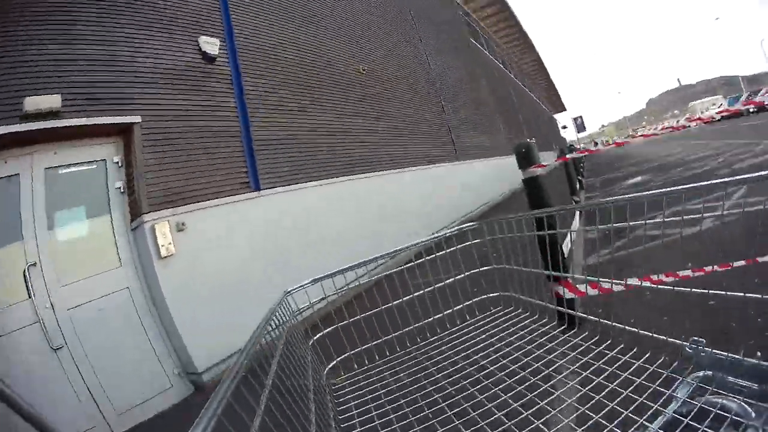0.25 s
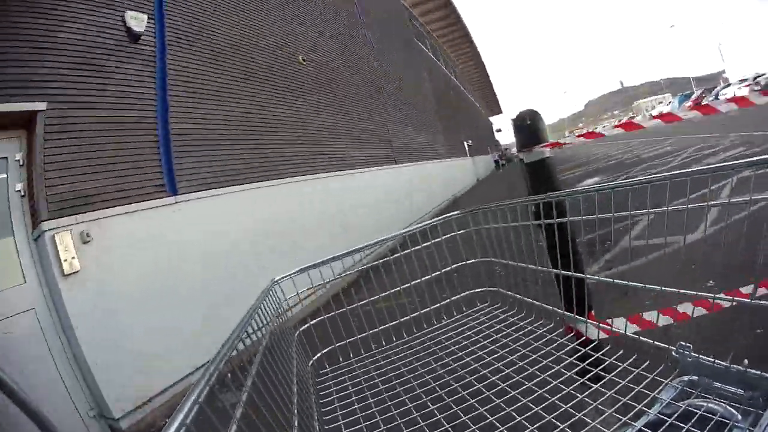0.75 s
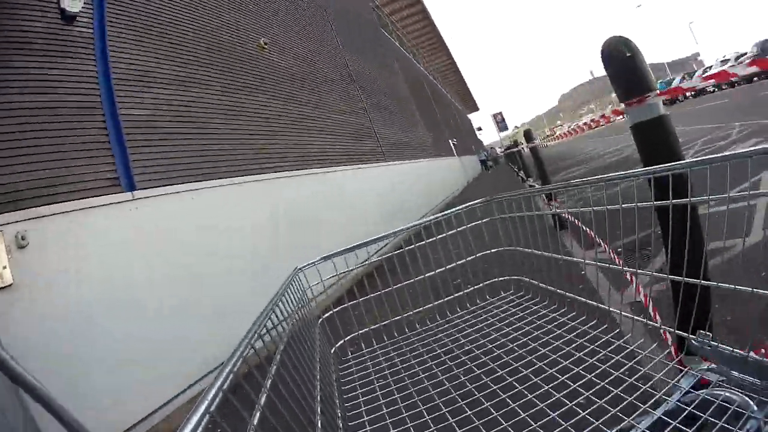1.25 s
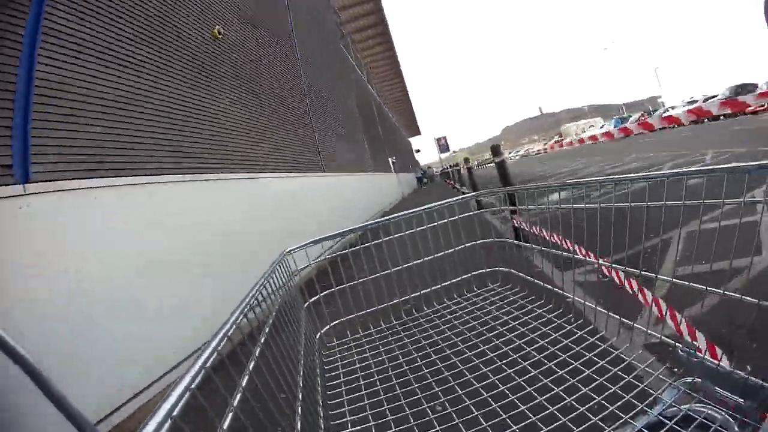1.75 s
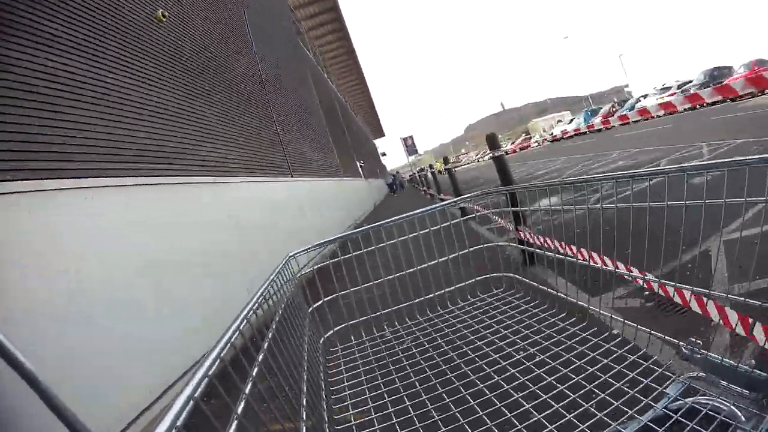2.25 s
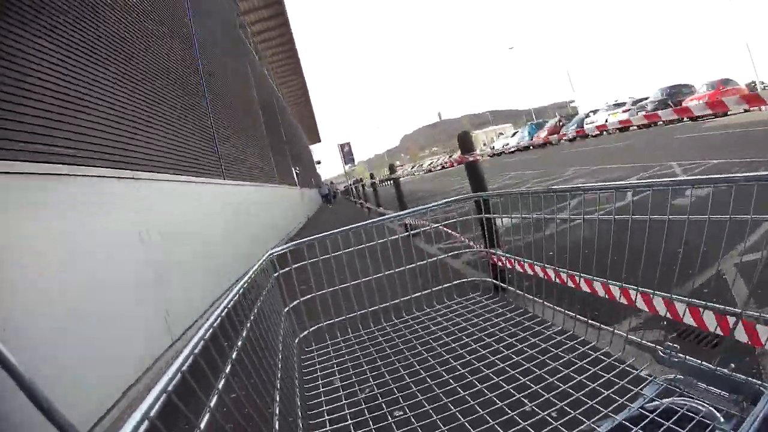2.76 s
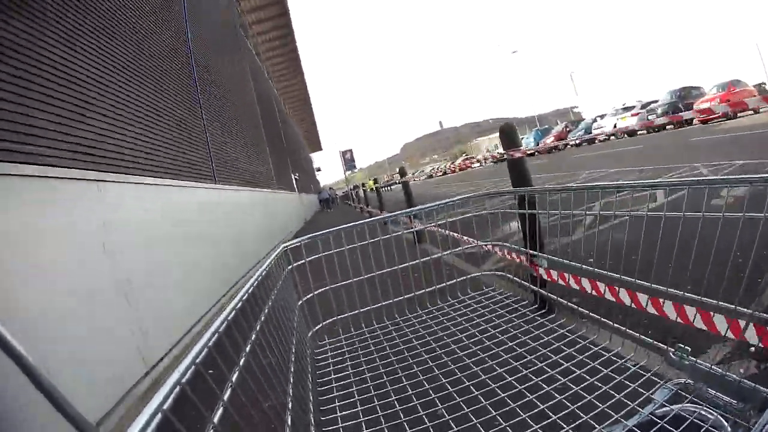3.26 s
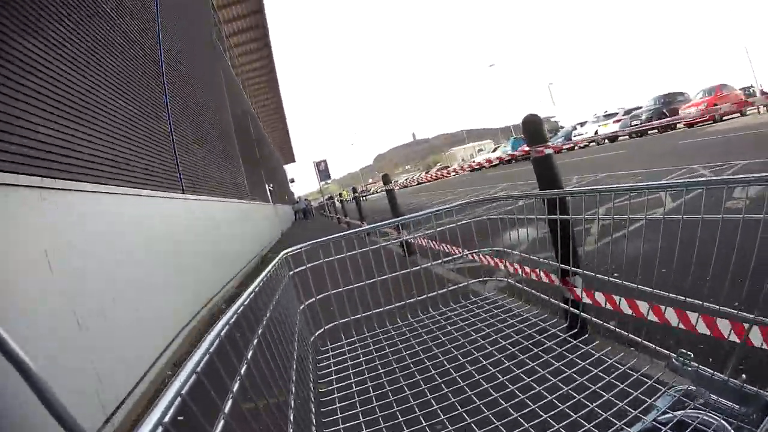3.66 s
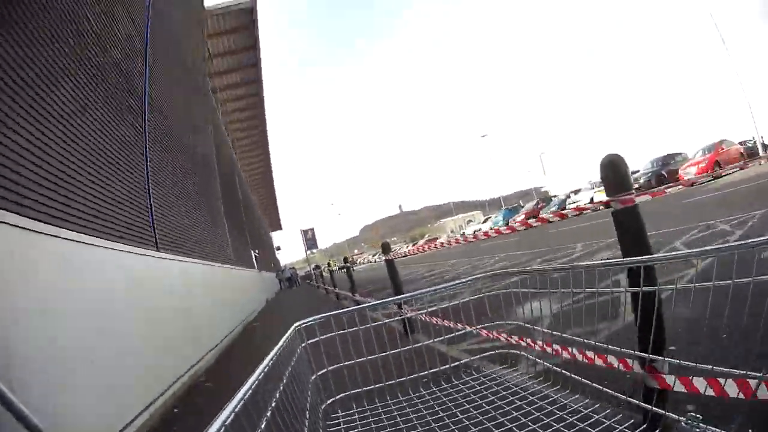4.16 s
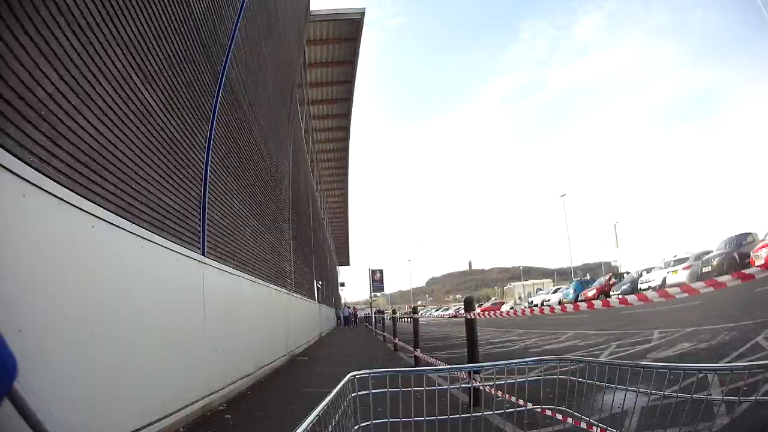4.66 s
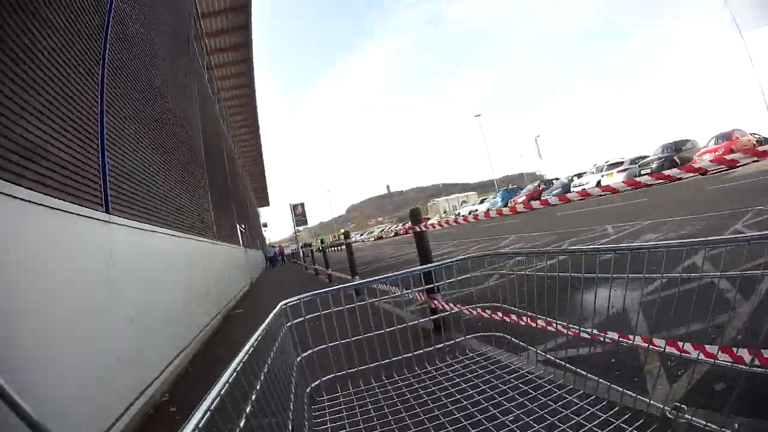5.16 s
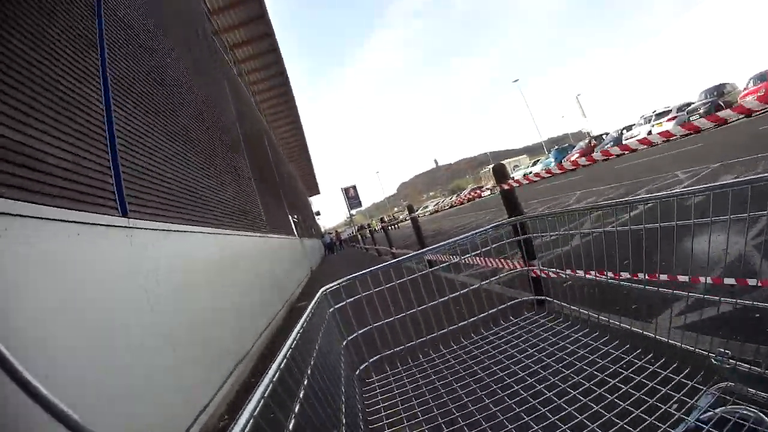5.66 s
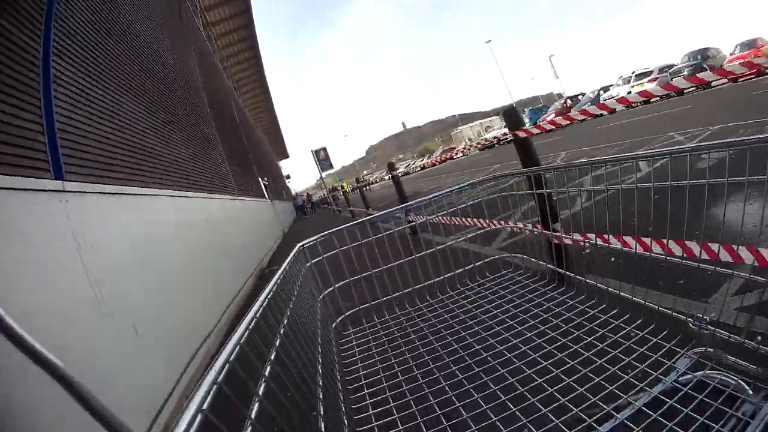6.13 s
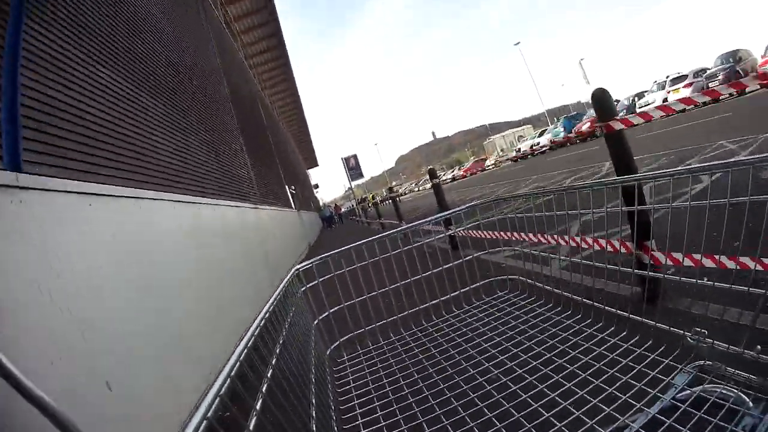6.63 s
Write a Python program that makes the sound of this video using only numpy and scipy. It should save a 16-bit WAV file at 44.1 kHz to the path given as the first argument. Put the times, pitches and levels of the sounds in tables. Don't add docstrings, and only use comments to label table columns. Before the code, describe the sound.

An empty shopping trolley rolls outside, its basket ticking and rattling, with clustered harsh clacks close to the microphone that thin into quiet rolling.

```python
import sys
import numpy as np
from scipy import signal
from scipy.fft import rfft, irfft
from scipy.io import wavfile
from scipy.ndimage import uniform_filter1d, minimum_filter1d

SR = 44100
rng = np.random.default_rng(int(sys.argv[2]) if len(sys.argv) > 2 else 0)


def volts_from_db(level):
    exponent = np.asarray(level, float) / 20
    return 10 ** exponent


def unload_audio(sound):
    columns = np.transpose(np.atleast_2d(sound))
    steps = np.round(np.clip(columns, -1, 1) * 32767)
    wavfile.write(sys.argv[1], SR, steps.astype(np.int16))


N = 303849

# t/s, jiggle of the mesh level/dB, coarseness of the ground level/dB
ROLLING = [(0, -54.5, -57), (.38, -51, -55.5), (.7, -52.5, -56.5), (.95, -46, -49.5), (1.33, -53.5, -53.5),
           (1.55, -50.5, -66), (1.9, -49.5, -55.5), (2.1, -53.5, -59.5), (2.47, -49.5, -53),
           (2.66, -55, -54.5), (2.85, -44, -45), (3.23, -42.5, -43.5), (3.6, -48.5, -43),
           (3.8, -43.5, -48.5), (4.0, -47.5, -47.5), (4.3, -56.5, -60.5), (5.2, -57, -64), (6.89, -56, -57)]
# centre t/s, half length t/s, jiggle change level/dB, coarseness change level/dB
GROUND_PATCHES = [(0.258, 0.056, -1, 7), (1.707, 0.16, 7.5, 19.5), (2.267, 0.23, 5, 13),
                  (3.02, 0.16, 1, -4), (4.76, 0.15, 4, 0.5), (5.331, 0.095, 8.5, 12), (5.655, 0.27, 1, 8.5),
                  (5.904, 0.072, -6, -1), (6.227, 0.21, 5, 10), (6.502, 0.1, -6.5, -3),
                  (6.638, 0.12, 12, 9.5)]
# f/Hz, level/dB (per Hz)
WHEEL_SPECTRUM = [(15, 1), (30, -1), (75, 4.5), (130, -3), (260, -1.5), (450, -6), (900, -9.5), (1500, -35),
                  (3000, -63)]
# f/Hz, width f/Hz, level/dB
BASKET_MODES = [(252, 39, 19), (564, 16, 2), (690, 85, -6), (850, 37, -19)]
# f/Hz, level/dB
WIRE_SPECTRUM = [(1500, -8), (2500, -7.5), (3500, -6.5), (4500, -0.5), (5700, 6), (6500, 1.5), (7500, -6),
                 (9000, -14), (11000, -27.5), (13000, -28.5), (16000, -68)]
# t/s, level/dB
WIRE_TICKS = [(0.1834, -38), (0.242, -29), (0.2882, -34), (0.3862, -29), (0.44, -28), (0.4707, -28.5),
              (0.492, -31), (0.7167, -26), (0.8602, -23), (2.3316, -26.5), (2.5916, -30.5), (2.9326, -20.5),
              (3.3338, -31), (3.4106, -36), (3.4987, -24), (4.1016, -25), (4.1145, -28.5), (4.1453, -29),
              (4.655, -32.5), (4.996, -34), (5.3715, -22.5), (5.8238, -32), (6.0646, -32), (6.121, -35),
              (6.1624, -22), (6.238, -27), (6.2982, -30), (6.3741, -22), (6.55, -32), (6.665, -28),
              (0.0555, -37), (0.2332, -33), (0.3534, -39), (0.4202, -35), (3.265, -26),
                       (3.4242, -34), (3.6174, -31.5), (4.058, -33), (4.1855, -34.5), (4.4212, -36.5),
                       (4.564, -37.5), (4.633, -37), (5.0376, -39), (5.1114, -37.5), (5.1363, -37),
                       (5.2036, -37), (5.288, -39), (5.3608, -34), (5.4254, -37), (5.5276, -37),
                       (5.8614, -40.5), (6.1876, -41), (6.2806, -35), (6.3136, -33), (6.3987, -34),
                       (6.685, -31), (6.6967, -35), (6.829, -35.5), (6.849, -42)]
# t/s, level/dB
LONG_WIRE_TOUCHES = [(0.0478, -41.5), (0.242, -39.5), (0.324, -36), (0.3988, -36), (0.551, -39),
                     (0.7158, -41), (2.331, -36.5), (3.3338, -49), (3.971, -34), (4.0883, -41),
                     (4.1754, -41), (4.214, -45), (4.3253, -48), (4.3437, -38.5), (4.568, -42),
                     (4.622, -40), (4.7426, -37), (4.78, -40.5), (4.8114, -43), (4.872, -45), (4.896, -43),
                     (4.962, -41.5), (5.295, -42), (5.3364, -44), (5.4386, -50), (5.6598, -41.5),
                     (5.7086, -50), (5.8037, -46.5), (5.9456, -43.5), (6.732, -43)]
# t/s, level/dB
WHEEL_BUMPS = [
    (.27, -38),
    (1.47, -23),
    (4.35, -44),
    (5.22, -38),
    (5.3, -39),
    (5.639, -38),
    (5.69, -32.5),
    (5.72, -37),
    (5.8, -42.5),
    (6.87, -39),
]
# t/s, level/dB
FRAME_THUDS = [(1.2121, -19), (1.4668, -11.5), (1.541, -31), (1.634, -25.5), (1.7992, -19.5),
               (2.171, -11.5), (2.7383, -26), (2.986, -19.5), (5.373, -12), (5.3817, -16.5),
               (5.3916, -26.5), (5.686, -37), (5.708, -39), (6.164, -14), (6.178, -28), (6.2137, -35),
               (6.237, -23), (6.3758, -13.5), (6.3982, -22), (6.407, -23), (6.425, -30), (6.862, -39),
               (6.873, -43)]
# f/Hz, relative size, t60 t/s
FRAME_MODES = [(310, 0.85, 0.026), (403, 0.51, 0.021), (543, 0.45, 0.028), (1590, 0.056, 0.027)]
# t/s, blow above overload level/dB
SCATTERED_KNOCKS = [(0.5995, 6.5), (0.67, 6), (0.6848, -3), (0.6984, 9.5), (0.779, -1.5), (1.1638, 5),
                    (1.2102, 19), (1.2514, -6), (1.4304, 8), (1.4661, 31), (1.4963, 1), (1.5381, 11),
                    (1.5827, 10.5), (1.6153, -5), (1.6316, 7), (1.6656, 12.5), (1.6953, -5), (1.7064, -7.5),
                    (1.7975, 14.5), (1.8142, -8.5), (1.8334, -3), (1.8716, -8.5), (2.054, -7), (2.1155, 6),
                    (2.1692, 29), (2.1994, 5), (2.231, -6), (2.4039, -4.5), (2.4275, 1.5), (2.4795, 7)]
# t/s, blow above overload level/dB
COARSE_STRETCH_KNOCKS = [(2.6733, -5), (2.7011, 6.5), (2.7359, 11), (2.7619, -1), (2.775, 1), (2.8487, 1.5),
                         (2.8851, -2.5), (2.9842, 24), (3.0584, 4), (3.1171, 1), (3.0959, -10.5),
                         (3.1524, 6), (3.161, -5.5), (3.2521, 3), (3.321, 1.5), (3.3803, -8), (3.4452, 2.5),
                         (3.5593, -3), (3.6517, 7), (3.6712, -10), (3.682, -3.5), (3.7642, -1.5),
                         (3.7842, 8), (3.822, -2), (3.839, -5.5), (3.8781, -5), (3.9476, -6),
                         (3.9606, -3.5), (4.0045, 4.5), (4.02, -8.5)]
# t/s, blow above overload level/dB,
# thump level/dB
TOUCHES_WITH_THUMP = [(0.6412, -13, -26), (0.647, -14, -29), (1.2595, -10.5, -21.5), (1.6445, -8.5, -28),
                      (1.6804, -11, -27), (1.6827, -14, -38), (1.7031, -8.5, -31), (2.18, -12, -14.5),
                      (2.381, -18.5, -29), (2.6808, -12.5, -41), (2.7522, -13, -21), (2.8154, -12.5, -30.5),
                      (2.866, -12, -24), (2.8724, -11, -27), (2.9504, -11, -45), (2.9949, -12, -37),
                      (3.013, -12, -22), (3.1274, 14, -44), (3.167, -14, -31), (3.2323, -9.5, -31),
                      (3.239, -15.5, -38), (3.2907, -12.5, -26.5), (3.4787, -11, -22), (3.667, -7, -38),
                      (3.7169, -13.5, -25), (3.7919, -8, -19.5), (3.8543, -10, -27), (3.8646, -9, -26),
                      (3.8871, -11, -26.5), (3.8971, -9, -28)]
# f/Hz, signed size, t60 t/s
HOUSING_MODES = [(106, 0.27, 0.029), (254, -0.64, 0.016), (521, -0.49, 0.028), (615.7, -0.21, 0.07),
                 (903, 0.66, 0.02), (1065, -0.1, 0.064), (1664, 0.32, 0.011)]
# f/Hz, size, t60 t/s
SHELL_MODES = [(2650, 0.06, 0.0026), (3940, 0.014, 0.0028), (6600, 0.03, 0.0011), (10100, 0.044, 0.01),
               (12170, 0.13, 0.0052), (15800, 0.01, 0.0012)]
# upper band edge f/Hz, level/dB below which sound is lost beside a
# knock, level/dB below which it is always lost
DROPOUT_BANDS = [(1570, -51, -95), (3440, -48.5, -90), (4630, -50.5, -91), (6700, -46.5, -85),
                 (9040, -46.5, -75), (16000, -53.5, -81)]

PORT_HZ, WIRE_HZ = 5613, 2968
COARSE_DB = -51
RUMBLE_EASE = 0.26
HUM_DB, SWISH_DB = -1.5, -2.5
HUM_SLOPE, SWISH_FADE = 1.34, 2.1
PING_TICK_DB = 4
BUMP_HZ, BUMP_T60_S = 150, 0.037
JOLT_HZ, JOLT_T60_S, JOLT_DB, JOLT_SLOPE = 75, 0.038, -43.5, 0.98
BODY_DB, BODY_SLOPE, BODY_FULL_DB = -19, 0.47, 15
REBOUND_MS, REBOUND_SPREAD_MS, REBOUND_DB, REBOUND_BODY_DB = 5.2, 1.3, -20.5, -12
JITTERS = 260
JITTER_DB, JITTER_SLOPE, JITTER_BODY_DB = -38.5, 1.9, -9.5
SLOT_S, SLOT_OFFSET = 1024 / 48000, .24
TOP_HZ = 16700


def unit(x):
    return x / np.sqrt(np.mean(x ** 2))


def colour(x, table):
    hz, db = np.transpose(table)
    grid = np.log(np.arange(len(x) // 2 + 1) * SR / len(x) + 1)
    gain = volts_from_db(np.interp(grid, np.log(hz), db))
    return irfft(rfft(x) * gain, len(x))


def band(x, hz, width):
    return signal.lfilter(*signal.iirpeak(hz, hz / width, fs=SR), x)


def ring(modes, length):
    t = np.arange(int(length * SR)) / SR
    return sum(g * np.sin(2 * np.pi * hz * t) * np.exp(-np.log(1000) * t / t60) for hz, g, t60 in modes)


def blows(s, db):
    return np.bincount(np.clip((s * SR).astype(int), 0, N - 1), volts_from_db(db), N)


def smear(x, response):
    return signal.fftconvolve(x, response)[:N]


def fade(t60):
    return np.exp(-np.log(1000) * np.arange(int(t60 * SR)) / (t60 * SR))


def walk(rate):
    k = int(SR / rate)
    held = np.repeat(rng.standard_normal(N // k + 1), k)
    slewed = uniform_filter1d(uniform_filter1d(held, k), k)
    return unit(slewed[:N])


def ground():
    t = np.arange(N) / SR
    s, *columns = np.transpose(ROLLING)
    levels = np.array([np.interp(t, s, c) for c in columns])
    for at, half, jiggle_db, coarse_db in GROUND_PATCHES:
        presence = np.clip(1 - np.abs(t - at) / half, 0, 1)
        levels += presence * np.array([[jiggle_db], [coarse_db]])
    return levels


def wheels(rumble_db, swish_db):
    rumble = unit(colour(rng.standard_normal(N), WHEEL_SPECTRUM)) * volts_from_db(2.6 * walk(25))
    hiss = band(band(rng.standard_normal(N), 1660.0, 2300.0), 1760.0, 3100.0)
    swish = unit(hiss) * volts_from_db(4.6 * walk(90))
    return volts_from_db(rumble_db + 2.5) * rumble + volts_from_db(swish_db - 3.0) * swish


def basket(db):
    shake = rng.standard_normal(N) * volts_from_db(3.6 * walk(60))
    hum = unit(sum(volts_from_db(g) * band(shake, hz, w) / np.sqrt(w) for hz, w, g in BASKET_MODES))
    mesh = unit(band(shake, 629.0, 26.0) + band(shake, 602.3, 14.0)) * volts_from_db(.5 * (db + 39.0))
    return volts_from_db(db - 5.5) * band(hum + mesh, 580.0, 940.0)


def burst(envelope):
    noise = rng.standard_normal(N)
    return colour(envelope * noise, WIRE_SPECTRUM) / np.std(colour(noise, WIRE_SPECTRUM))


def wires(hits, low_hits):
    tick = burst(0.36 * smear(hits, fade(0.0049)) + 0.3 * smear(hits, fade(0.037)))
    low = smear(low_hits, ring([(WIRE_HZ, 1.1, .028), (2850, .8, .024), (3090, .7, .02)], .06))
    return tick + band(low, WIRE_HZ, 716.0)


def rattle(db):
    touches = 1400
    where = rng.random(touches) * N / SR
    size = np.minimum(rng.exponential(size=touches), 4)
    low = rng.standard_normal(touches)
    ticks = wires(blows(where, 3.5 * size), blows(where, 2.5 * size + 4.0 * low - 15))
    blur = burst(volts_from_db(3.5 * walk(45)))
    shake = rng.standard_normal(N) * volts_from_db(6.5 * walk(250))
    buzz = unit(band(band(shake, PORT_HZ, 1000.), PORT_HZ, 1000.))
    return volts_from_db(db) * (volts_from_db(1.0) * unit(ticks) + volts_from_db(-11.0) * blur + volts_from_db(1.8 * (db + 41.5)) * buzz)


def bumps():
    s, db = np.transpose(WHEEL_BUMPS)
    pulse = ring([(BUMP_HZ, 1, BUMP_T60_S), (0.59 * BUMP_HZ, .6, BUMP_T60_S)], .08)
    return smear(smear(blows(s, db), pulse), np.hanning(60) / 30)


def thuds():
    s, db = np.transpose(FRAME_THUDS)
    flexing = smear(smear(blows(s, db + 3.0), ring(FRAME_MODES, .08)), np.hanning(12) / 7.1)
    return signal.sosfilt(signal.butter(2, 200., "high", fs=SR, output="sos"), flexing)


def jolts():
    s, blow_db = np.transpose(SCATTERED_KNOCKS + COARSE_STRETCH_KNOCKS)
    return smear(blows(s + 0.0013, JOLT_DB + JOLT_SLOPE * blow_db), ring([(JOLT_HZ, -1, JOLT_T60_S)], .1))


def strikes():
    s, blow_db = np.transpose(SCATTERED_KNOCKS + COARSE_STRETCH_KNOCKS)
    body_db = BODY_DB + BODY_SLOPE * np.minimum(blow_db, BODY_FULL_DB)
    c = rng.standard_normal((3, len(s)))
    rebound_s = s + (REBOUND_MS + REBOUND_SPREAD_MS * np.clip(c[0], -2, 2)) / 1000
    rebound_db = np.minimum(blow_db, 0) + REBOUND_DB + 2.5 * c[1]
    rebound_body_db = body_db + REBOUND_BODY_DB + 4.0 * c[2]
    graze_s, graze_db, graze_body_db = np.transpose(TOUCHES_WITH_THUMP)
    chance, size = rng.random(JITTERS) * (N - 1), rng.standard_normal(JITTERS)
    coarse_db = ground()[1, chance.astype(int)] - COARSE_DB
    jitter_db = JITTER_DB + JITTER_SLOPE * coarse_db + 5.2 * size
    return (np.r_[s, rebound_s, graze_s, .001 + chance / SR],
            np.r_[blow_db, rebound_db, graze_db, jitter_db],
            np.r_[body_db, rebound_body_db, graze_body_db, jitter_db + JITTER_BODY_DB])


def knocks():
    s, blow_db, body_db = strikes()
    peak_db = np.minimum(blow_db, -1.2)
    contact_ms = .8 + .03 * np.clip(blow_db + 3.0, 0, 15)
    rise_ms = .06 - 0.012 * peak_db
    out, ms = np.zeros(N + 8192), np.arange(256) * 1000 / SR
    chance = rng.standard_normal((len(s), 1 + len(HOUSING_MODES)))
    for t, db, hold, rise, thump_db, c in zip(s, peak_db, contact_ms, rise_ms, body_db, chance):
        start = int((t - .0001) * SR)
        shape = (1 - np.exp(-ms / rise)) * np.exp(-ms / 5.0) / (1 + np.exp((ms - hold) / .1))
        port_hz = PORT_HZ * (1 + 0.0042 * c[0])
        out[start:start + len(ms)] -= 1.104 * volts_from_db(db) * shape * np.sin(2 * np.pi * port_hz * ms / 1000)
        modes = [(hz * (1 + 0.027 * k), g, t60) for (hz, g, t60), k in zip(HOUSING_MODES, c[1:])]
        thump = ring(modes, 0.13)
        out[start:start + len(thump)] += volts_from_db(thump_db + 0.5) * thump
    shell = smear(blows(s - .0001, 8.8 * peak_db + 8.0), ring(SHELL_MODES, .02))
    chatter = smear(blows(s, peak_db - 24.5), fade(0.03)) * volts_from_db(5.0 * walk(400))
    return out[:N] + shell + burst(chatter)


def scene():
    jiggle_db, ground_db = ground()
    coarse = np.maximum(ground_db - COARSE_DB, 0)
    rolling = wheels(ground_db - RUMBLE_EASE * coarse, jiggle_db + SWISH_DB - SWISH_FADE * coarse)
    rolling += basket(ground_db + HUM_DB + HUM_SLOPE * coarse)
    rolling += rattle(jiggle_db)
    at, tick_db = np.transpose(WIRE_TICKS)
    low_at, low_db = np.transpose(LONG_WIRE_TOUCHES)
    hits = blows(at, tick_db + 0.5) + blows(low_at, low_db + PING_TICK_DB)
    ticks = wires(hits, blows(low_at, low_db - 2.0))
    return (rolling + ticks + bumps() + thuds() + jolts() + knocks())[None]


def dropout_slots():
    thud_blows = [(t - .002, db + 6) for t, db in FRAME_THUDS]
    s, blow_db = np.transpose(SCATTERED_KNOCKS + COARSE_STRETCH_KNOCKS + thud_blows)
    start = (np.floor(s / SLOT_S - SLOT_OFFSET) + SLOT_OFFSET) * SLOT_S
    depth_db = np.minimum(2.27 * (blow_db + 7.0), 0)
    depth = np.cumsum(blows(start, depth_db) - blows(start + SLOT_S, depth_db))
    return np.clip(uniform_filter1d(depth, size=48), 0, 1)


def drop_quiet(x):
    slots, out, below = dropout_slots(), x, 0
    for hz, keep_db, faint_db in DROPOUT_BANDS:
        low = signal.sosfiltfilt(signal.butter(6, hz, fs=SR, output="sos"), x)
        part, below = low - below, low
        size = uniform_filter1d(np.abs(part), size=180)
        lost_beside = slots / (1 + (size / volts_from_db(keep_db)) ** 6)
        lost_always = 1 / (1 + (size / volts_from_db(faint_db)) ** 6)
        out = out - part * np.maximum(lost_beside, lost_always)
    return out


def top_cut(x):
    return signal.sosfilt(signal.butter(12, 17320, fs=SR, output="sos"), x)


def record(dry):
    x = np.clip(dry[0], -.79, .84)
    near = uniform_filter1d(-minimum_filter1d(-np.abs(x), size=240), size=60)
    hiss = colour(rng.standard_normal(N), [(500, -3), (5500, 1), (9000, -3.5), (16000, -17.5)])
    x = x + volts_from_db(-27.0) * near ** 3 * hiss
    x = signal.sosfilt(signal.ellip(8, .2, 70, TOP_HZ, fs=SR, output="sos"), x)
    mix = drop_quiet(x)[None]
    return top_cut(mix)


dry = scene()
out = record(dry)
unload_audio(out)
```